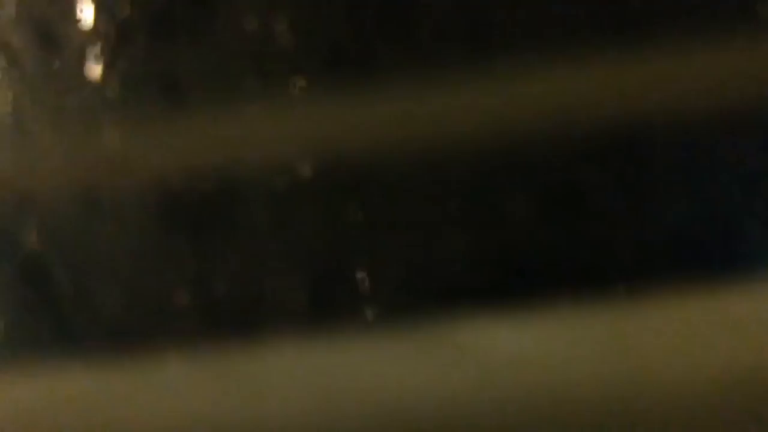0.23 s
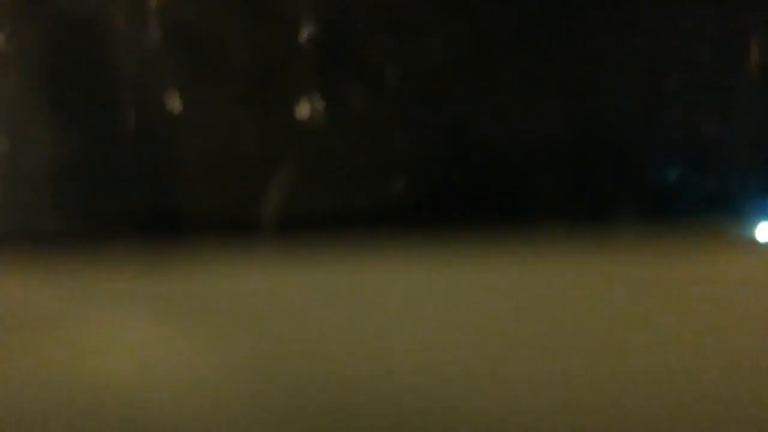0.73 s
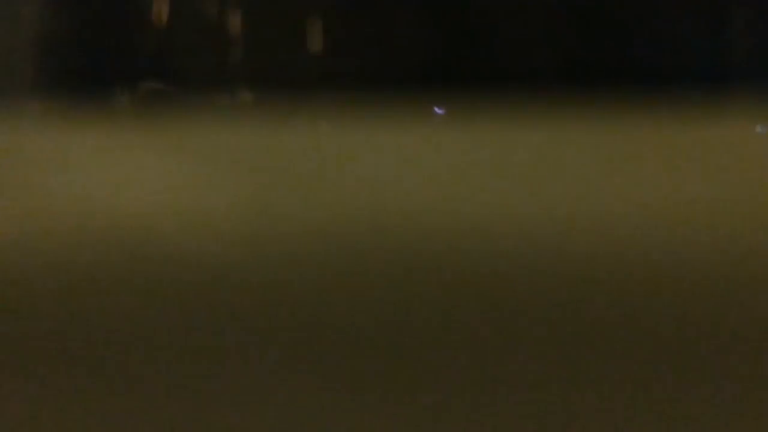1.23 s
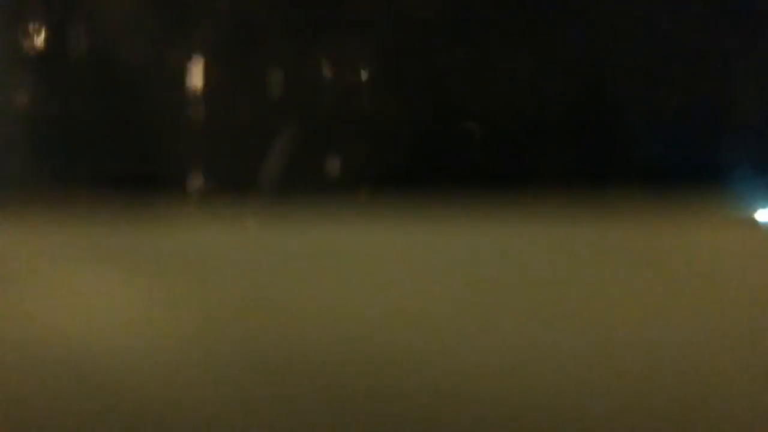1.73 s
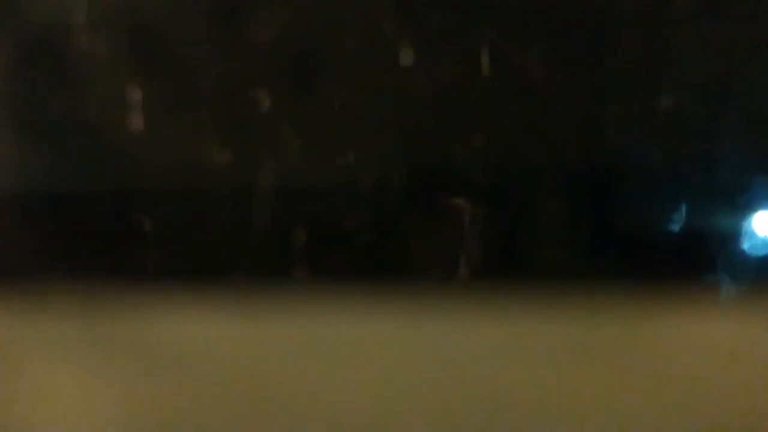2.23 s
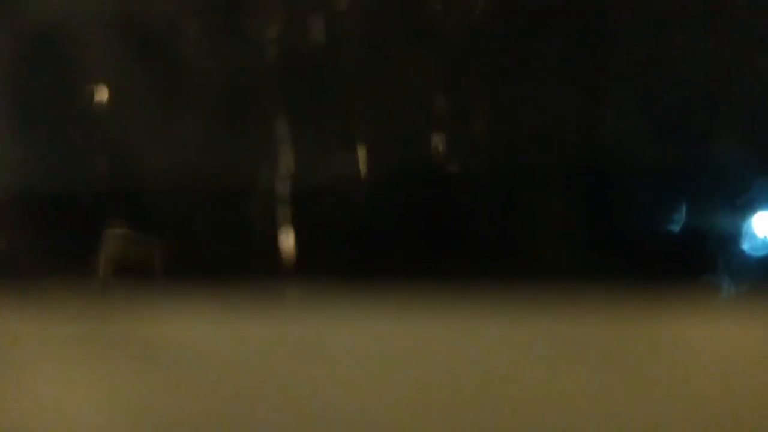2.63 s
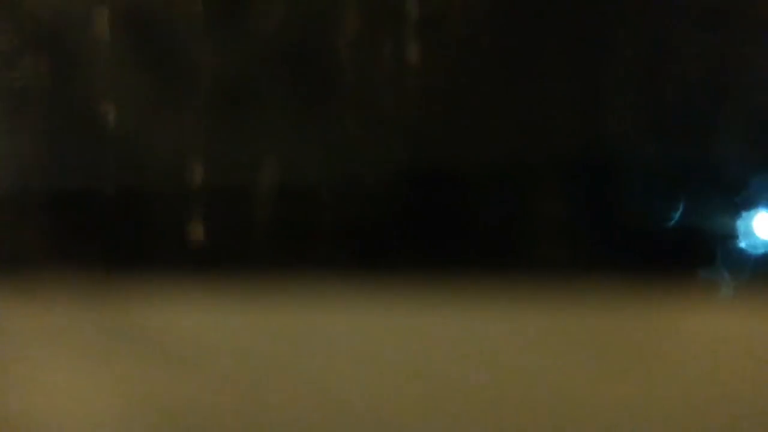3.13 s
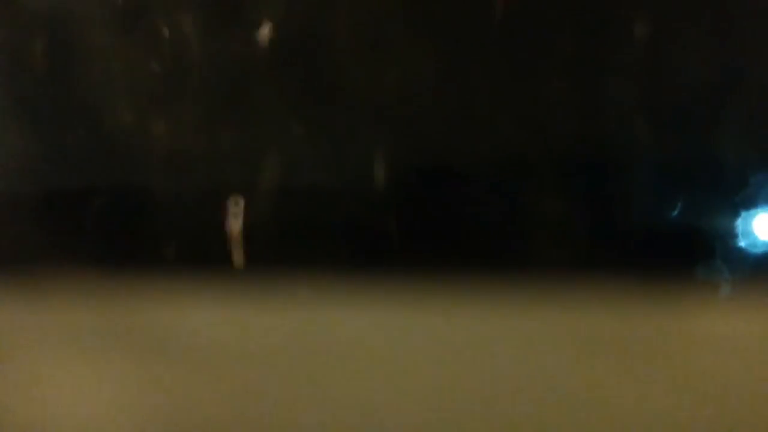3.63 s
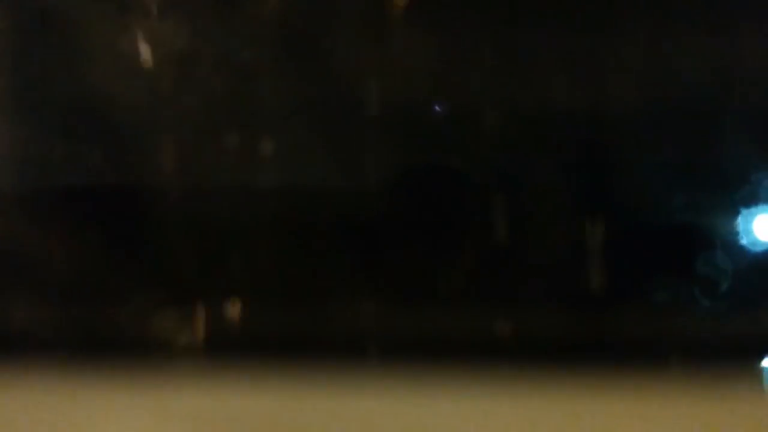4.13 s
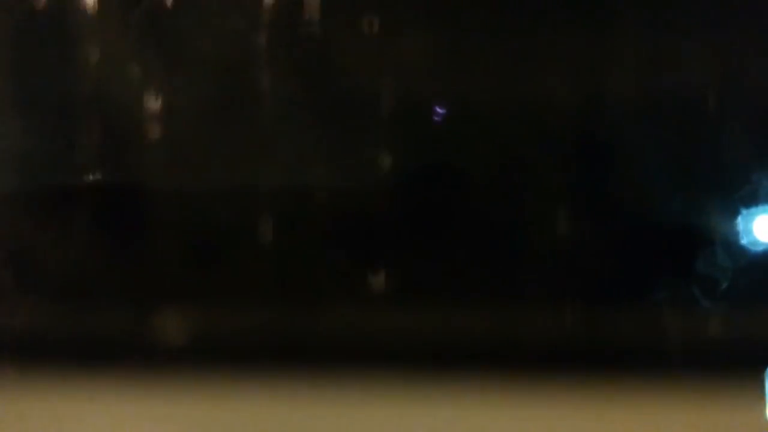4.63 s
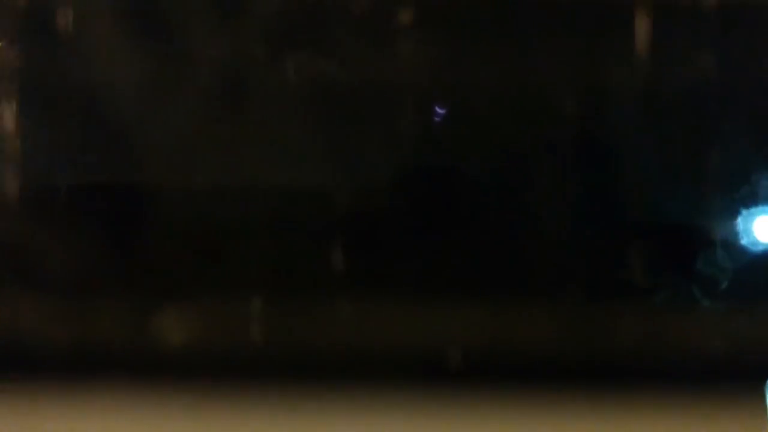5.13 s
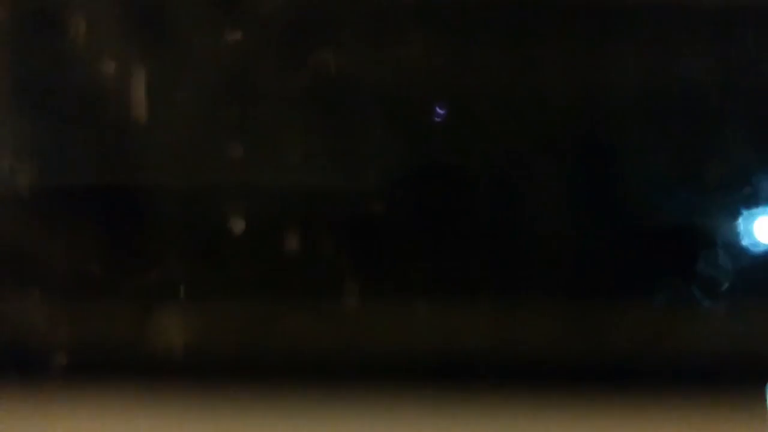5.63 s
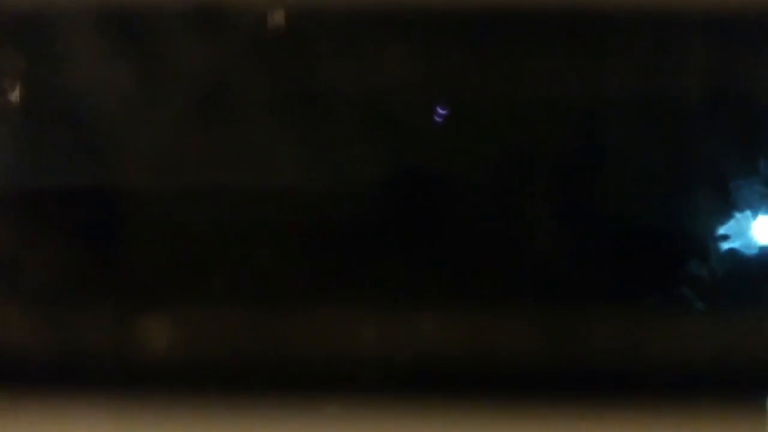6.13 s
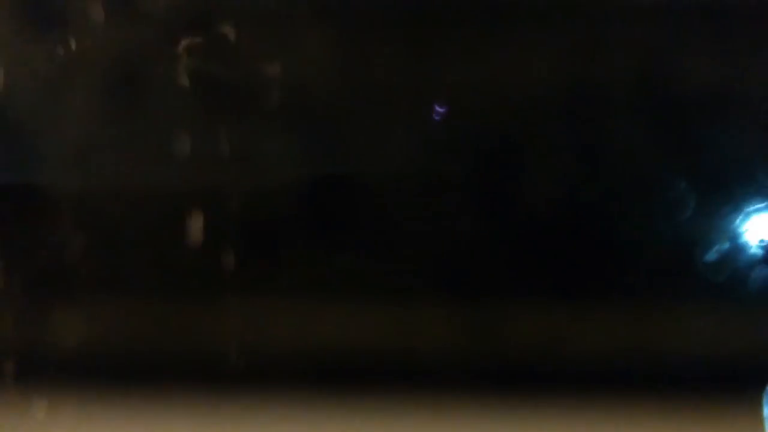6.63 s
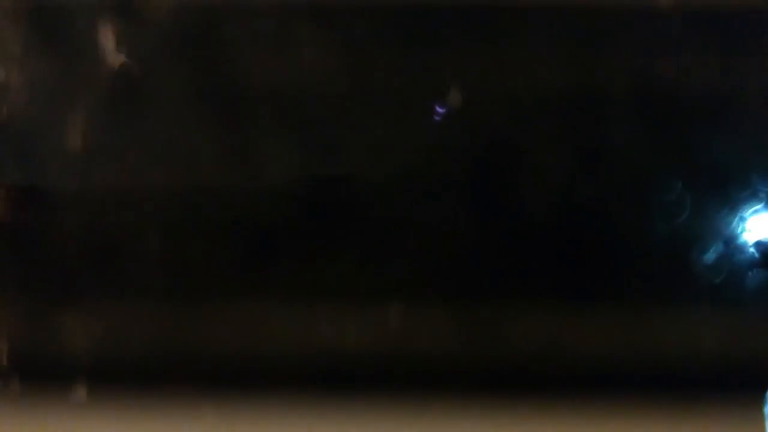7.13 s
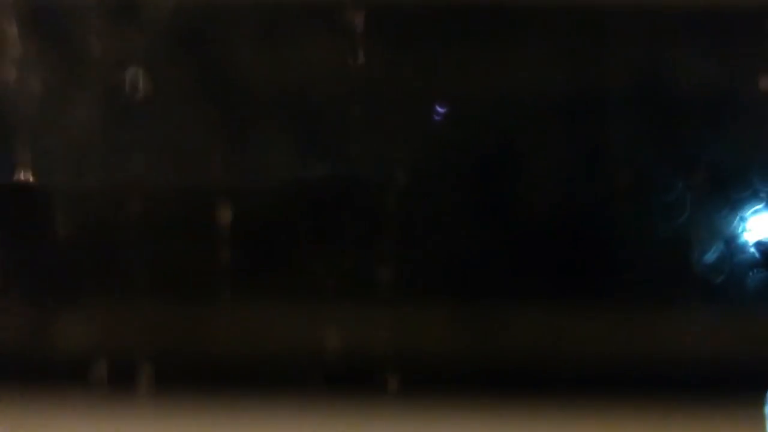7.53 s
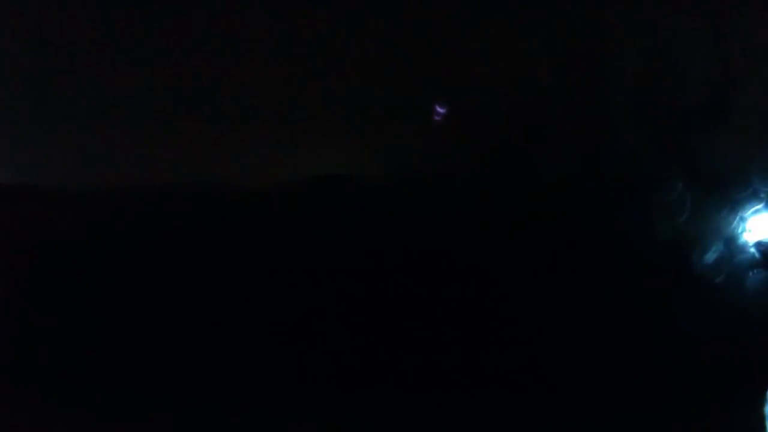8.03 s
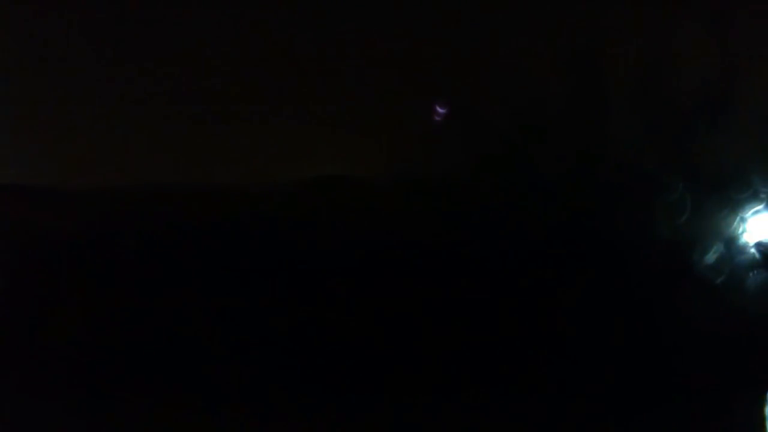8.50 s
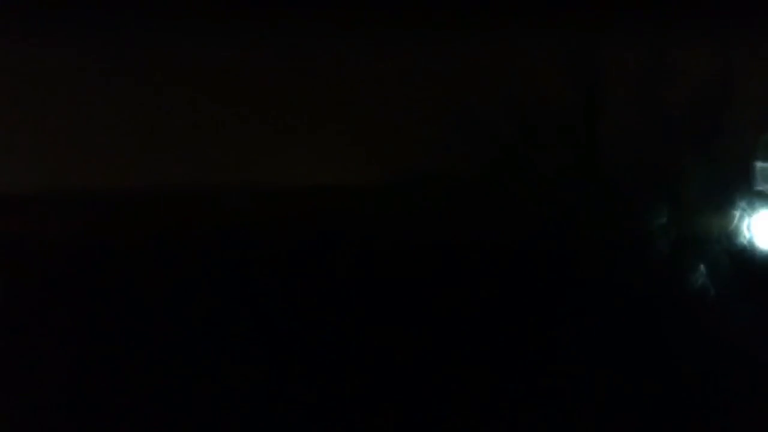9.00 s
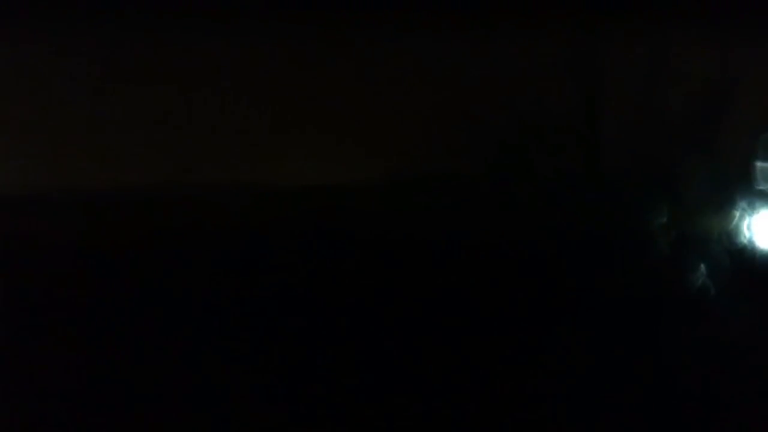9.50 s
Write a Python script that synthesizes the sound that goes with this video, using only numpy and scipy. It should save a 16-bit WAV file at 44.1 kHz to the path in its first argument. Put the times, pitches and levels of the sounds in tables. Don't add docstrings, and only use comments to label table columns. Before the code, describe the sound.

Night rain at a window, heard very close by a hand-held stereo microphone touching the blind. From 0 to 0.8 s the rain is subdued under dry finger rustle, small clacks and dull case thuds. At 0.9 s a hard shove overloads with a blunt thump; the rain drops sharply, then climbs back over two seconds amid soft bumps until 1.7 s. From 2.4 to 4 s it is full: grainy hiss, boomy glass, hollow slat drumming, with a cluster of loud knocks around 3.1-3.3 s and more to 4 s. Sharp drop ticks continue; a pipe hums faintly and wind rumbles low. A loud slat crack at 5.5 s dips the rain slightly. Hard knocks at 6.3 and 7.13 s, with thuds between, duck it strongly. It gradually returns by about 9 s, steady with scattered drips until the end at roughly 9.8 s.

```python
import sys
import numpy as np
from scipy import signal
from scipy.io import wavfile

SR = 44100
rng = np.random.default_rng(int(sys.argv[2]) if len(sys.argv) > 2 else 0)


def voltage_ratio(decibels):
    exponent = np.asarray(decibels, float) / 20
    return 10 ** exponent


def transcribe(signal):
    frames = np.atleast_2d(signal).T
    limited = np.clip(frames, -1, 1)
    pcm = np.round(limited * 32767).astype(np.int16)
    wavfile.write(sys.argv[1], SR, pcm)


N = 430416


def rms_one(x):
    return x / np.sqrt(np.mean(x ** 2) + 1e-20)


def in_time(rows):
    s, *columns = np.transpose(rows)
    return [np.interp(np.arange(N) / SR, s, c) for c in columns]


def band(x, low_hz, high_hz):
    edges_hz = [low_hz, min(high_hz, .45 * SR)]
    return signal.sosfilt(signal.butter(2, edges_hz, "band", fs=SR, output="sos"), x)


def dull(x, cut_hz):
    return signal.sosfilt(signal.butter(4, min(cut_hz, .45 * SR), fs=SR, output="sos"), x)


def resonance(x, hz, width_hz):
    r = np.exp(-np.pi * width_hz / SR)
    poles = [1, -2 * r * np.cos(2 * np.pi * hz / SR), r * r]
    return signal.lfilter([(1 - r * r) / 2, 0, (r * r - 1) / 2], poles, x)


def drift(rate_hz):
    r = np.exp(-80 * np.pi * rate_hz / SR)
    noise = rng.standard_normal(N // 40 + 2002)
    slow = signal.lfilter([1], [1, -2 * r, r * r], noise)[2000:]
    return np.interp(np.arange(N) / 40, np.arange(len(slow)), rms_one(slow))


def drops(per_s, spread_db):
    sizes = voltage_ratio(spread_db * np.minimum(rng.exponential(1, N), 5)) * rng.choice([-1, 1], N)
    return rms_one(sizes * (rng.random(N) < per_s / SR))


def blow(z, hz, t60, ragged, breadth, snap):
    t = np.arange(len(z)) / SR
    swing = np.sin(2 * np.pi * hz * t) * voltage_ratio(-60 * t / t60)
    push = snap * np.sin(np.pi * np.minimum(3.03 * hz * t, 1)) ** 2
    rattle = rms_one(dull(resonance(z, hz, breadth * hz), 1.8 * hz))
    rattle_fade = voltage_ratio(-60 * t / (2.82 * t60)) * np.minimum(t * hz, 1)
    return push + dull(swing, 14.0 * hz) + ragged * rattle * rattle_fade


def input_hiss(hiss_db):
    return voltage_ratio(0.52 * hiss_db - 46.5) * dull(band(rng.standard_normal(N), 9800, 21000), 15300)


# t/s, level/dB
BUFFETS = [(0, 0), (1.1, -1), (1.7, 11), (2.1, -6), (2.8, -10), (3.1, -3.5), (5.2, 2), (5.7, -9),
           (5.95, 11.5), (6.4, 7), (6.9, -3), (7.6, -9), (8.1, -4), (8.55, -12), (8.85, 3), (9.2, -14),
           (9.6, 1), (9.76, -3)]


def rumble(gain_db):
    buffet_db, = in_time(BUFFETS)
    drone = band(band(rng.standard_normal(N), 50, 83), 40, 117) * voltage_ratio(2.2 * drift(2.2))
    return voltage_ratio(gain_db + buffet_db - 41) * rms_one(drone)


def gutter(hiss_db):
    filling_db, = in_time([(0, -26.5), (4.9, 0)])
    return voltage_ratio(hiss_db + filling_db + 6.5) * rms_one(resonance(rng.standard_normal(N), 636.0, 26))


# f/Hz, level/dB per Hz
RAIN_COLOUR = [(900, 5), (1300, 15), (2000, 14), (2700, 11.5), (3700, 18.5), (4500, 10), (5500, -2.5),
               (7000, -44), (8500, -63), (11000, -42), (15000, -44)]


def splash():
    hz, db = np.transpose(RAIN_COLOUR)
    edges = 800 * 2 ** np.arange(0, 4.5, 1 / 2)
    gust, out = drift(23.0), 0
    far = rng.standard_normal((2, N))
    fade = voltage_ratio(-60 / (.016 * SR))
    for k, (low, high) in enumerate(zip(edges, edges[1:])):
        if k % 2 == 0:
            spray = signal.lfilter([1], [1, -fade], abs(drops(per_s=130.0, spread_db=2.5)))
        colour_db = np.interp(np.log(low * high) / 2, np.log(hz), db)
        level_db = colour_db + 1.17 * gust + 1.53 * drift(21.0)
        wet = far[k % 2] * (1 + 0.72 * rms_one(spray))
        out = out + voltage_ratio(level_db) * band(band(wet, low, high), 0.97 * low, 1.68 * high)
    return out / np.std(band(out, 2500, 6000))


# t/s, gust on the blind/dB, hand pressing the case to the pane/dB
WINDOW_DRIVE = [(0, 2, -1.5), (.5, -6, -6.5), (.88, 2, -6.5), (1.07, 6, 2), (1.5, 5, 4), (2.2, 6.5, 0),
                (2.7, 0, 0.5), (3.18, 7.5, -1), (3.76, 5.5, 1.5), (4.2, -0.5, 0), (5.3, 0, -1.5),
                (5.7, 0.5, 0.5), (6.2, 1.5, 4), (6.55, 4.5, 4), (6.8, -5, -5), (7.6, 1, -4),
                (8.75, 2.5, -4), (9.76, -4.5, -2)]


def window_levels(gain_db):
    gust_db, hand_db = in_time(WINDOW_DRIVE)
    return gain_db + hand_db + 0.14 * gust_db - 37, gain_db + gust_db - 39.5


def drumming(modes, cut_hz):
    out, near, gust = 0, drops(per_s=250.0, spread_db=3.0), drift(6.9)
    for k, (hz, width_hz, db) in enumerate(modes):
        push = (rng.standard_normal(N) + 1.19 * near) * voltage_ratio(2.0 * gust + 2.34 * drift(9.2))
        out = out + (-1) ** k * voltage_ratio(db) * resonance(push, hz, width_hz)
    return rms_one(dull(out, cut_hz))


# f/Hz, width/Hz, level/dB
PANE_MODES = [
    (125, 150, -13.5),
    (173, 59, -0.5),
    (275, 51.7, -4.5),
]


def pane(level_db):
    return voltage_ratio(level_db) * drumming(PANE_MODES, cut_hz=530)


# f/Hz, width/Hz, level/dB
BLIND_MODES = [
    (452, 178, -5),
    (632, 24.4, 2),
    (703, 107, -4),
    (850, 500, -12.5),
]


def blind(level_db, cut_hz):
    return voltage_ratio(level_db) * drumming(BLIND_MODES, cut_hz)


# t/s, level/dB, f/Hz
SINGLE_DROPS = [(0.4117, -22.5, 4060), (.821, -24, 3760), (1.4334, -27, 2630), (2.6035, -25, 4060),
                (3.0762, -18.5, 3160), (3.181, -12.5, 3370), (3.216, -12.5, 2470), (3.3415, -17, 5050),
                (3.4752, -15, 4000), (3.5157, -15.5, 3120), (3.699, -15, 3770), (3.7425, -12.5, 3090),
                (3.9352, -18.5, 3160), (3.9584, -19, 5160), (4.1707, -15, 3500), (4.4982, -18, 3540),
                (4.8339, -17.5, 3370), (4.8652, -12.5, 3700), (5.3296, -11, 4000), (5.3562, -18, 3260),
                (5.4954, -16.5, 4180), (5.6316, -21.5, 4000), (5.7828, -22.5, 3660), (5.9718, -18.5, 3560),
                (6.3051, -14.5, 6130), (8.7973, -20, 3730), (9.1721, -24, 3500), (9.472, -19, 3240),
                (9.5093, -20, 3670), (9.695, -18, 3620),
                (1.721, -28.5, 2000), (2.049, -28.5, 2400), (2.544, -28, 4500), (3.762, -15, 1540),
             (4.407, -23, 3300), (4.562, -18, 2010), (4.737, -16.5, 1850), (5.684, -27, 3100),
             (5.862, -19, 2100), (8.41, -26, 4500), (8.63, -33, 5000), (9.006, -18, 1540),
             (9.073, -20, 3700), (9.12, -24, 1500)]


def ticks():
    out, rows = np.zeros(N + 600), SINGLE_DROPS
    for (s, peak_db, hz), z in zip(rows, rng.standard_normal((len(rows), 600))):
        i = round(s * SR)
        spit = blow(z, hz, 0.012, ragged=0.77, breadth=0.23, snap=0.17)
        out[i:i + 600] += voltage_ratio(peak_db - 12.0) * spit
    return dull(out[:N], 6000)


def rustle():
    t = np.arange(SR) / SR
    stroke_s, half_s, firm_s = 0.36, 0.048, 0.83
    db = -62.5 + 7 * np.exp(-((t - stroke_s) / half_s) ** 2) + 2.0 * drift(7.1)[:SR]
    dry = rng.standard_normal(SR) + 0.41 * drops(per_s=720.0, spread_db=-5.0)[:SR]
    return np.pad(voltage_ratio(db) * (t < firm_s) * rms_one(band(dry, 3700, 11200)), (0, N - SR))


# t/s, level/dB, bright edge/dB
EDGE_SNAPS = [(0.1123, -25.5, -28), (0.2128, -28.5, -16), (.9165, -32, -32), (1.2835, -63, -50),
              (1.3395, -60, -46), (1.3995, -50, -47), (1.4335, -50, -50), (1.529, -54, -50),
              (3.7514, -21, -31), (4.8655, -30, -17), (5.33, -41, -16), (5.4966, -28, -24),
              (5.6325, -43, -11), (6.3035, -16, -17.5), (6.6305, -19.5, -39), (6.9153, -34.5, -14),
              (7.1325, -35, -36)]


def snaps():
    out, t = np.zeros(N + 600), np.arange(600) / SR
    for (s, peak_db, edge_db), z in zip(EDGE_SNAPS, rng.standard_normal((len(EDGE_SNAPS), 600))):
        burst, i = z * voltage_ratio(-60 * t / 0.018), round(s * SR)
        crackle = dull(band(burst, 900, 5800), 5800)
        out[i:i + 600] += voltage_ratio(peak_db) * (crackle + voltage_ratio(edge_db) * band(burst, 6400, 16000))
    return out[:N]


# t/s, level/dB, f/Hz, t60/s
SLAT_BLOWS = [(.111, -22, 955, 0.01), (.211, -18.5, 450, 0.0097), (.529, -30, 660, 0.058),
              (.629, -17, 443, 0.011), (.645, -19, 530, .022), (.66, -32, 520, 0.025),
              (.9165, -14.5, 470, 0.0076), (1.283, -29, 534, 0.05), (1.338, -28.5, 554, 0.032),
              (1.398, -26.5, 584, 0.012), (1.433, -23, 486, 0.018), (1.528, -22, 520, 0.017),
              (2.767, -20.5, 790, 0.057), (2.866, -21, 495, 0.12), (3.035, -17.5, 616, 0.067),
              (3.141, -8, 470, 0.02), (3.181, -7, 530, 0.021), (3.265, -7.5, 749, 0.072),
              (3.566, -13.5, 520, 0.017), (3.75, -9.5, 504, 0.065), (3.866, -15, 547, 0.018),
              (3.981, -21.5, 1080, 0.032), (5.492, -5.5, 699, 0.036), (5.631, -18, 740, 0.024),
              (6.303, -7.5, 516, 0.0068), (6.63, -33, 840, 0.038), (6.915, -28, 560, 0.024),
              (7.1316, -14.5, 970, 0.008), (8.6083, -21.5, 910, 0.017)]
# t/s, level/dB
SLAT_DRIPS = [(2.499, -23.5), (2.687, -24.5), (3.471, -26), (3.797, -26), (4.079, -22.5), (4.12, -22),
              (4.234, -23), (4.439, -23), (4.815, -20.5), (5.015, -27), (5.148, -22.5), (5.344, -21),
              (5.383, -17), (5.413, -25), (5.716, -28), (5.756, -27), (6.156, -28), (6.616, -32),
              (8.333, -31), (8.589, -49), (8.762, -22), (8.912, -19), (9.124, -38), (9.187, -24),
              (9.506, -43), (9.643, -21)]


def slats():
    out, t = np.zeros(N + 4000), np.arange(4000) / SR
    rows = [(*slat, slat[1] - 29) for slat in SLAT_BLOWS]
    rows += [(s, db, 620, 0.032, db - 38) for s, db in SLAT_DRIPS]
    for (s, peak_db, hz, t60, crack_db), z in zip(rows, rng.standard_normal((len(rows), 4000))):
        crack = dull(band(z[::-1] * voltage_ratio(-60 * t / 0.0043), 900, 6500), 6500)
        splat = blow(z, hz, max(t60, .005), ragged=0.35, breadth=0.83, snap=1.0)
        i = round((s + 0.001424) * SR)
        out[i:i + 4000] += voltage_ratio(peak_db - 4.0) * splat + voltage_ratio(crack_db - 1.5) * crack
    return out[:N]


# t/s, level/dB, f/Hz, t60/s
CASE_THUDS = [(.205, -37.5, 171, 0.11), (.248, -32, 195, 0.016), (.461, -37.5, 171, 0.3),
              (.529, -26, 195, .068), (.559, -30, 182, 0.046), (.591, -19.5, 142, .06),
              (.629, -19.5, 178, 0.1), (.658, -15, 178, 0.029), (.915, -13.5, 212, 0.02),
              (1.052, -43.5, 275, 0.13), (1.282, -36, 164, 0.048), (1.334, -31, 307, 0.063),
              (1.367, -30, 286, 0.011), (1.398, -31, 275, 0.034), (1.433, -27.5, 257, 0.05),
              (1.459, -39, 264, 0.056), (1.526, -22.5, 220, 0.018), (1.646, -34.5, 108, 0.08),
              (1.718, -31.5, 107, 0.1), (6.299, -23, 276, 0.027), (6.317, -13, 193, 0.031),
              (6.396, -20.5, 197, 0.038), (6.553, -31.5, 72.7, .044), (6.625, -16.5, 62.3, 0.076),
              (6.744, -24, 165, 0.046), (6.785, -37, 169, .057), (6.911, -42.5, 106, 0.13),
              (7.085, -33, 163, 0.049), (7.1297, -10, 163, 0.025), (7.168, -40, 164, 0.11)]
# t/s, level/dB, f/Hz
PANE_BOOMS = [(2.423, -27.5, 151), (2.496, -34, 153), (2.767, -29, 203), (2.868, -33, 316),
              (3.036, -22, 287), (3.087, -25.5, 246), (3.137, -34, 310), (3.182, -20.5, 232),
              (3.225, -21.5, 273), (3.297, -21, 234), (3.333, -32, 247), (3.744, -25.5, 257),
              (3.808, -23, 267), (3.864, -28, 294), (8.819, -33, 203), (8.92, -35, 258),
              (4.466, -21.5, 190), (6.029, -34, 165), (6.097, -23.5, 185), (6.147, -29, 193)]


def thuds():
    out = np.zeros(N + 8000)
    rows = CASE_THUDS + [(*boom, 0.069) for boom in PANE_BOOMS]
    for (s, peak_db, hz, t60), z in zip(rows, rng.standard_normal((len(rows), 8000))):
        i = round((s + 0.00299) * SR)
        thud = blow(z, hz, max(t60, .01), ragged=0.29, breadth=0.35, snap=0.39)
        out[i:i + 8000] += voltage_ratio(peak_db + 9.5) * thud
    return out[:N]


# t/s, level/dB, length/s
CASE_BLOWS = [
    (.9173, 0, .0022),
    (5.4945, -8, .0006),
    (6.3045, -1, .0008),
    (7.1325, -6, .0015),
]


def bumps():
    out, since = np.zeros(N), np.arange(12000) / SR
    for s, peak_db, length in CASE_BLOWS:
        i, rise = round(s * SR), np.minimum(since / length, 1)
        settling = 72.0 * length * rise * voltage_ratio(-60 * since / 0.12)
        out[i:i + 12000] += voltage_ratio(peak_db) * (np.sin(np.pi * rise) ** 2 + settling)
    return out


# t/s, depth/dB, climb back/dB per s
GAIN_DUCKS = [
    (-.01, 15, 15),
    (.922, 23.5, 11),
    (5.5, 6, 3.5),
    (6.301, 20.5, 8.5),
    (7.142, 18.5, 9.6),
]


def gain_control():
    t, gain_db = np.arange(0, N + 100, 100) / SR, 0
    for s, depth_db, climb in GAIN_DUCKS:
        since = np.maximum(t - s, 0)
        first_dip = 0.17 * np.exp(-since / 0.26)
        loss_db = depth_db * (1 + first_dip) - climb * since
        gain_db = np.minimum(gain_db, -loss_db * (t > s))
    return np.interp(np.arange(N) / SR, t, gain_db)


def scene():
    gain_db = gain_control()
    hiss_db = gain_db - 47.5
    pane_db, blind_db = window_levels(gain_db)
    drummed = pane(pane_db + 8.5) + blind(blind_db + 2.0, cut_hz=2070)
    rain = voltage_ratio(hiss_db + 4.0) * splash() + drummed + gutter(hiss_db) + rumble(gain_db)
    hits = band(thuds() + slats() + ticks() + snaps(), 59, 18000) + bumps()
    field = rain + hits + rustle() + input_hiss(hiss_db)
    own = voltage_ratio(hiss_db - 6.5) * band(splash(), 1900, 11000) + blind(blind_db - 24.5, cut_hz=2400)
    own += voltage_ratio(-6) * snaps() + voltage_ratio(-7) * rustle() + voltage_ratio(-7.5) * input_hiss(hiss_db)
    late = 20
    left = np.concatenate([np.zeros(late), field[:-late]])
    right = -signal.lfilter(*signal.butter(1, 60.0, "high", fs=SR), field)
    brighter = right + 0.24 * resonance(right, 1580, 500) + 0.26 * resonance(right, 4400, 5200)
    return np.array([left * voltage_ratio(-0.42), brighter + own])


def low_pass(x):
    return signal.sosfilt(signal.butter(12, 16480, fs=SR, output="sos"), x)


def record(dry):
    cut = signal.sosfilt(signal.cheby2(10, 50, 16500, fs=SR, output="sos"), dry)
    mix = np.clip(cut + .0026, -1, 1)
    return low_pass(mix)


dry = scene()
out = record(dry)
transcribe(out)
```